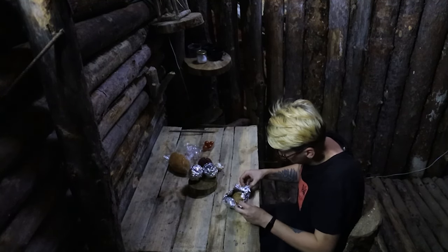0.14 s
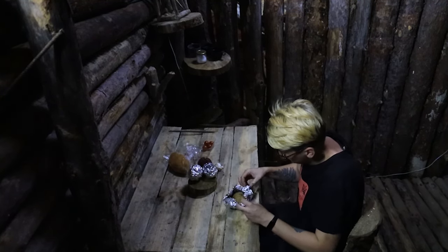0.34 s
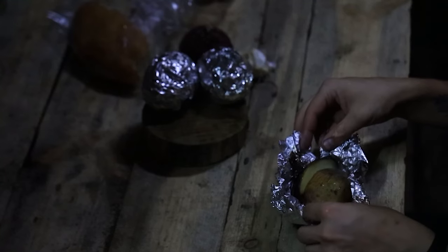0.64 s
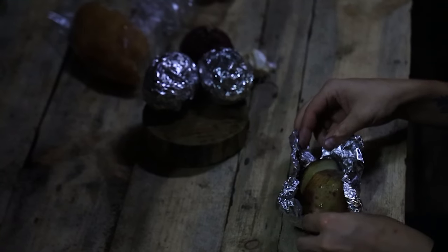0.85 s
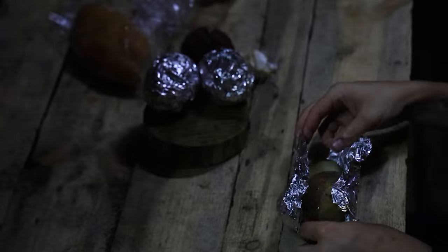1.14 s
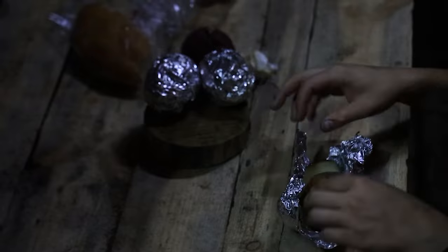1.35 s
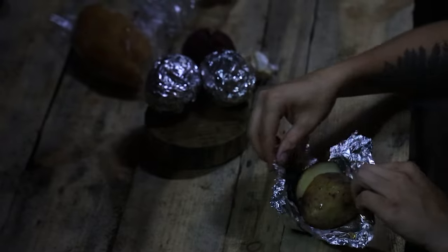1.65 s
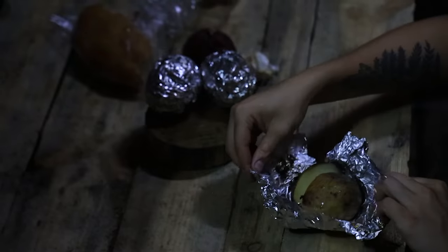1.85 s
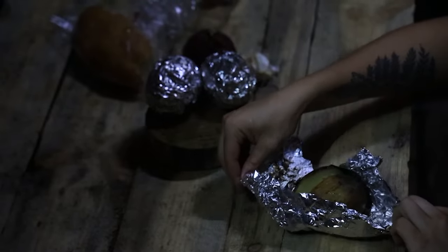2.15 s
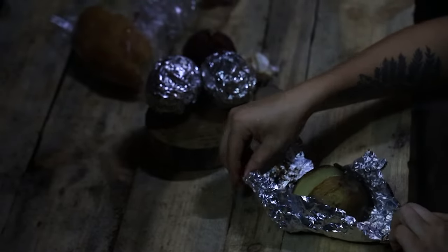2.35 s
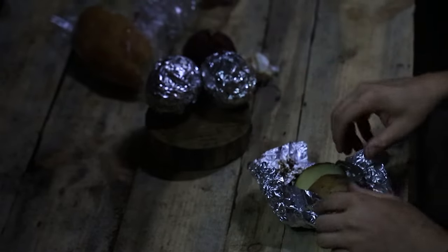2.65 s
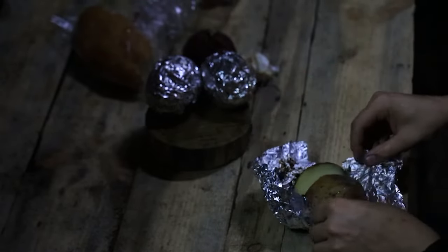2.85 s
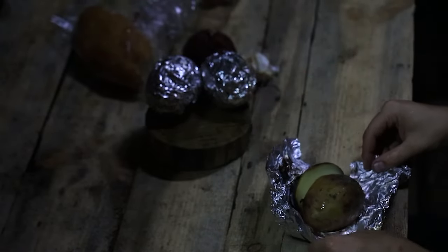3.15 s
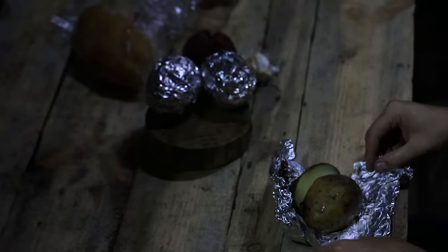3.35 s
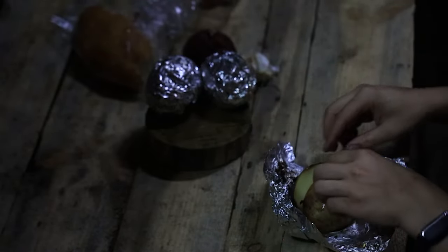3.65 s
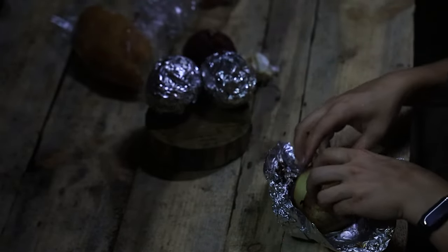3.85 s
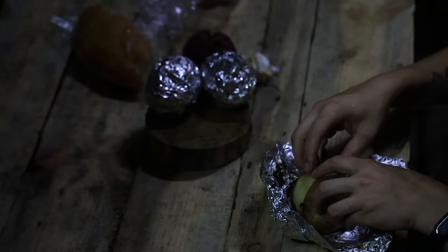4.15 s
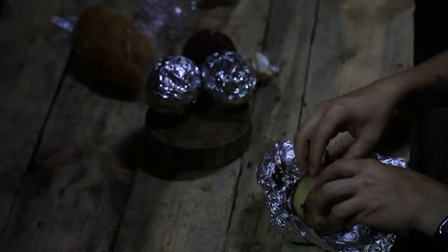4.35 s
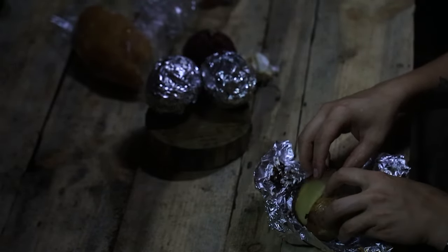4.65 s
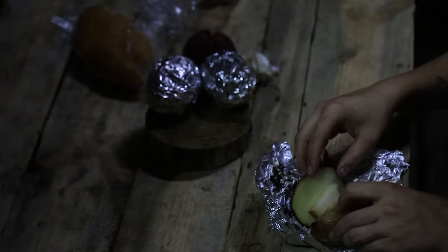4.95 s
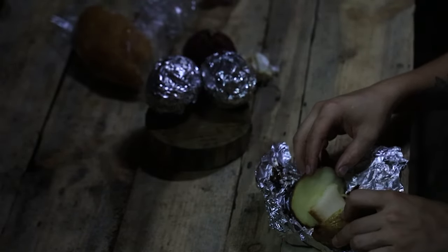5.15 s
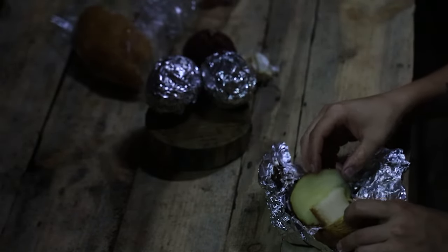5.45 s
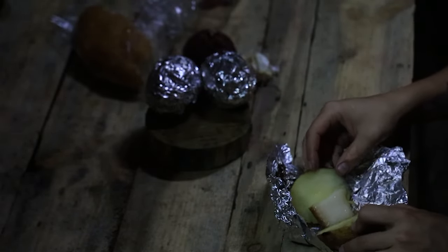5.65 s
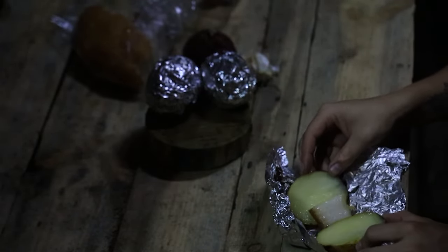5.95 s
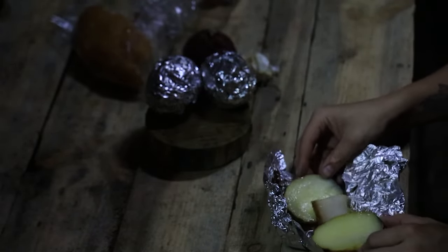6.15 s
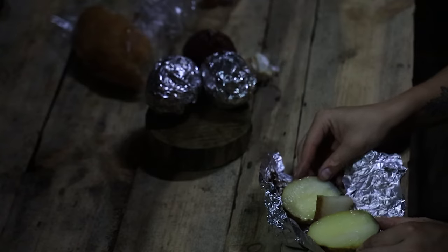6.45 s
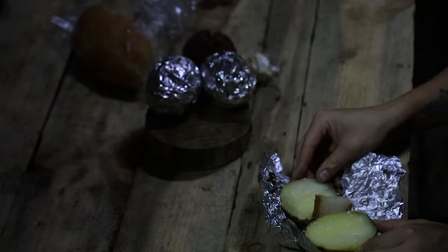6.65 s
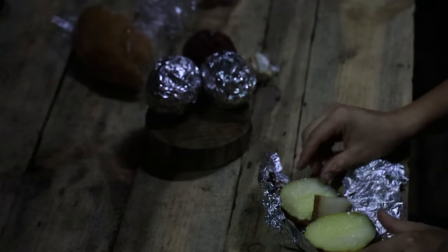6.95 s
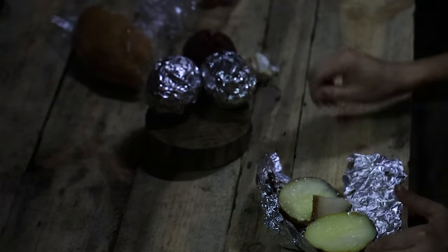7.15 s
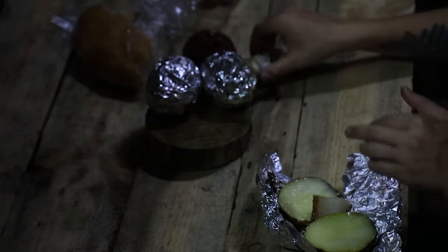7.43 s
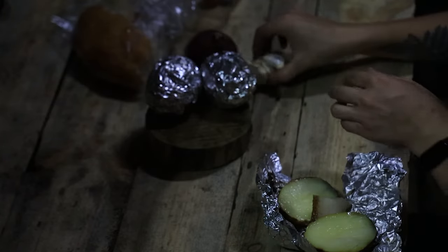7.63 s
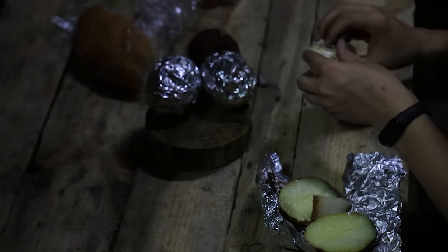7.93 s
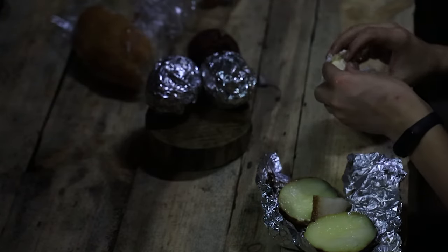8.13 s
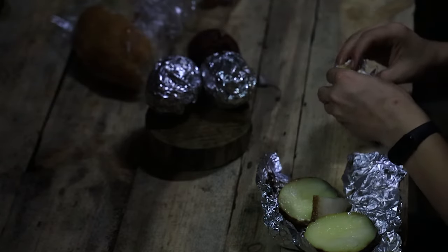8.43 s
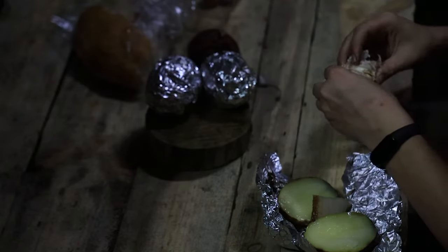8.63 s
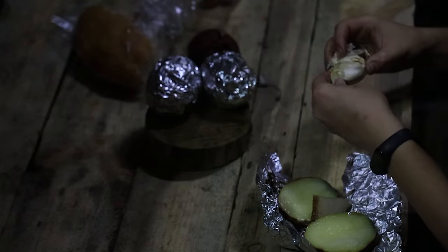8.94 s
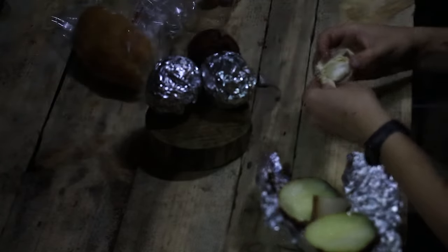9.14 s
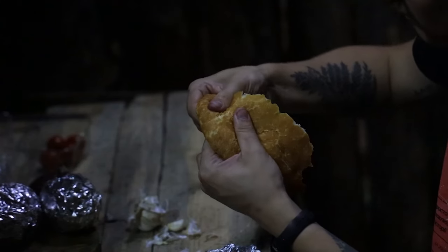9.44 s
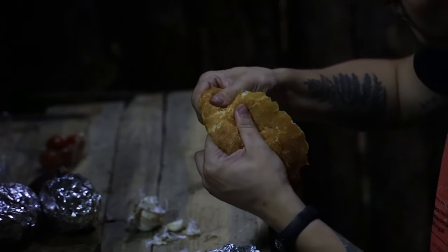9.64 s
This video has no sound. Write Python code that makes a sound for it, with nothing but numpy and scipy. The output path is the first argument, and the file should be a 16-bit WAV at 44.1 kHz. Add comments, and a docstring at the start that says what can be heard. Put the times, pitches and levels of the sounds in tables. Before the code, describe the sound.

Aluminium foil crackles and crinkles as it is peeled from a baked potato, then dry garlic skin snaps and rustles in a quiet log hut.

```python
"""Aluminium foil is unwrapped from a baked potato at a wooden table in a small, quiet log dugout.
Creases buckle in single snaps (clicks with settling ticks and a facet ring) over a fine crinkle of tiny rings.
Soft knocks are damped modes; filtered noise makes the shifting parcel and the sliding potato half.
Then a garlic bulb is picked up and cracked open, built like the foil but in a drier colour.
Log walls add a short tail of scattered paths; a murmur of air lies beneath, with a faint hum at the end."""
import sys
import numpy as np
from scipy import signal
from scipy.fft import rfft, irfft, next_fast_len
from scipy.io import wavfile
from scipy.ndimage import uniform_filter1d

SR = 44100
rng = np.random.default_rng(int(sys.argv[2]) if len(sys.argv) > 2 else 0)


def wrap_up_sound(samples):
    """Save the sound to the file named by the first command line argument, as 16-bit audio."""
    columns = np.atleast_2d(samples).T
    # keep every value between -1 and 1, then stretch to whole-number steps
    tamed = np.clip(columns, -1, 1)
    steps = np.round(tamed * 32767).astype(np.int16)
    wavfile.write(sys.argv[1], SR, steps)


N = 431738
TIME = np.arange(N) / SR

# Layer levels below are set ahead of the mix gains; body_db and sparkle_db are against the middle band.
# murmur of the air: freq_hz, level_db (per Hz, relative)
AIR_COLOUR = [(12, -46), (20, -20), (81, -5), (150, -5.5), (241, -1), (446, -4.5), (624, -7), (849, -7.5),
              (1220, -9.5), (1660, -12), (2260, -12), (2990, -13), (4420, -14.5), (9140, -19.5),
              (16000, -24.5)]
# left-right likeness of sound from all round: freq_hz, likeness (-1 to 1)
LIKENESS = [(30, 0.1), (120, 0.35), (300, 0.69), (700, 0.4), (1500, 0.31), (3000, 0.11), (6000, 0.059),
            (16000, 0.024)]
# the loudest creases to buckle: start_s, level_db, body_db, sparkle_db, ring_hz, ring_share (0-1)
FOIL_SNAPS = [(0.0085, -37.5, -11.5, -22, 2120, 0.065), (0.072, -44, -1, 3, 4560, 0.79),
              (0.1098, -35.5, -11, 6, 2960, 0.082), (0.1798, -43, -16, -6, 2040, 0),
              (0.2257, -30.5, -26, 5, 3540, 0.31), (0.3499, -40.5, -6, 3.5, 2460, .14),
              (0.6135, -40.5, 9, 14.5, 1700, 0.37), (0.8194, -33, -6.5, -10, 2070, 0),
              (0.88, -34.5, -24, 0, 4680, 0), (0.9328, -40.5, 6, -17, 2410, .4),
              (0.9941, -34, -21, 10, 2420, 0.34), (1.0104, -39, -14, -10, 2300, 0.65),
              (1.022, -28.5, -5, -4.5, 2150, 0), (1.0517, -37, -14, -11, 2120, 1),
              (1.0724, -33, -25, -2, 3900, 0), (1.0886, -36, -24, 1, 5650, 0),
              (1.1596, -31.5, -8.5, -7, 4370, 0), (1.249, -43.5, -7, 0, 5990, 0.14),
              (1.2667, -38, -4, -22, 1977, 1), (1.6316, -42.5, -7, 9, 6500, 0),
              (1.7019, -49.5, -10, 0, 4100, 0.69), (1.8004, -32.5, -9.5, -1, 3740, 0.27),
              (1.9026, -49.5, -16, -10, 4300, .7), (1.955, -44, -2.5, -27, 2970, 0.41),
              (2.0197, -35, -12, 3.5, 5700, 0.0043), (2.0522, -37.5, -10.5, 1, 4500, 0.023),
              (2.0942, -41.5, -12, 9, 4490, 0), (2.1027, -41.5, -12, 12, 2780, 0.26),
              (2.1569, -33.5, -4, -7, 2480, 0.034), (2.1738, -36, -7, -4, 2820, 0.057),
              (2.204, -32, -24, 1.5, 3500, 0.34), (2.235, -34, -15, -4, 2600, 0),
              (2.3516, -49, -14, 16, 3930, 0.23), (2.4088, -48.5, -17, -8, 2530, 0.21),
              (2.6067, -52, -17, -18, 3200, 0.96), (2.7318, -45.5, 0, -2, 4270, .6),
              (2.7771, -33, -7, 4.5, 4140, 0.59), (2.9411, -50, -8, -6, 4950, 0.8),
              (3.0075, -36.5, -2, -22, 5080, 0.54), (3.1511, -38, -11, -0.5, 4770, 0),
              (3.223, -44.5, -19, -9, 3130, .27), (3.2456, -44.5, -12, -19, 2000, 0.74),
              (3.2992, -40.5, -8.5, -12, 2110, 0.17), (3.352, -36, -13, -7, 5230, 0),
              (3.5462, -45, -11, 3.5, 8800, 0.04), (4.143, -56.5, -12, -14, 2360, 0.2),
              (4.4034, -44.5, -9, 7, 4630, 0.6), (4.968, -55.5, -12, 19, 4240, .5),
              (5.027, -56, 0, 5, 4530, 0.18), (5.0641, -51, -25, -6, 4260, 0.13),
              (5.3737, -39.5, -7, 19, 7770, .5), (5.4081, -41.5, -7, -3, 4400, 0),
              (5.4955, -37.5, -30, 7, 5640, 0), (5.5517, -37.5, -15, 3.5, 5950, 0.07),
              (5.641, -49, -19, 4, 4950, 0.18), (5.6686, -35, -13, 5.5, 3190, 0.51),
              (5.7473, -35, -19, -9, 2170, 0.01), (5.8371, -35.5, -11, 5, 8740, 0.077),
              (5.8483, -35.5, -21, -1, 4900, 0.43), (5.9032, -37.5, -6.5, 0, 2880, 0.38),
              (6.0072, -41.5, -4, 5.5, 2490, 0.13), (6.051, -40, -15, -2, 1730, 0.39),
              (6.1106, -38, -7, 0, 2260, 0.35), (6.1505, -34.5, -8, 2, 3930, 0.63),
              (6.3347, -39.5, -10, -6, 4430, 0.55), (6.4758, -46, -14, 1, 3030, 0.4),
              (6.5429, -35, -11, 15, 3700, 0.63), (6.5538, -32, -6.5, -5, 3550, 0.044),
              (6.7932, -49, -16, 4, 1520, .4), (6.8223, -47.5, -4, -6, 2190, 0.66),
              (6.9035, -47.5, -16, 2, 7600, 0.53), (6.984, -44, -5, -4, 2350, 0.27),
              (7.0982, -39, -4.5, -9, 2330, 0.47)]
# pulls and presses of the fingers on the foil: start_s, swell_s, fade_s, level_db, body_db, sparkle_db
FOIL_STROKES = [(0.02, 0.22, 0.12, -50.5, -15, -3), (0.62, 0.049, 0.091, -44, -3.5, -4),
                (0.82, 0.2, 0.13, -37, -5, -3.5), (1.15, 0.011, 0.021, -34.5, 0, -6),
                (1.26, 0.047, 0.01, -37.5, -4.5, -3.5), (1.585, 0.027, 0.031, -41.5, -6, -4),
                (1.7, 0.013, 0.043, -50, -3, -5), (1.82, 0.059, .04, -54, -4, -2),
                (2.06, 0.1, 0.16, -41, -9, -6.5), (2.157, 0.014, .008, -32, -6, -9),
                (2.275, 0.04, 0.0086, -37.5, -9.5, -7.5), (2.415, 0.052, 0.02, -41.5, -3, -1),
                (2.605, .015, 0.014, -49, -4, -3.5), (2.765, 0.084, 0.022, -42.5, -5, -3),
                (3.05, 0.032, 0.086, -40.5, -14, -7), (3.23, 0.062, 0.037, -50, -7, -10),
                (3.46, 0.0074, 0.058, -45.5, -12, -3), (3.965, 0.02, 0.049, -54.5, -14, -8),
                (4.14, .01, 0.074, -60.5, -15, -13), (4.395, 0.0073, 0.022, -51, -19, -7),
                (4.51, .022, 0.038, -57, -22, -3), (4.87, 0.013, 0.028, -57.5, -6, -8),
                (5.29, 0.075, 0.025, -51.5, -12, -7), (5.375, 0.033, 0.013, -41.5, -10, -11),
                (5.495, .01, 0.14, -55, -19, 13), (5.7, 0.28, 0.092, -46.5, -9, -2),
                (6.0, 0.023, 0.12, -46.5, -11, -20), (6.183, 0.0059, .095, -35.5, -9, -6),
                (6.5, 0.049, 0.029, -37, -10.5, -5.5), (6.8, 0.013, 0.2, -52, -6, -4),
                (7.085, 0.0069, 0.0068, -44.5, -17, -8)]
# tone of the foil: freq_hz, level_db (per Hz, relative)
FOIL_COLOUR = [(120, -32), (300, -9), (550, -8.5), (800, -5), (1400, -1), (2200, -1), (3000, 1), (4200, -1),
               (6500, -7.5), (9000, -14), (13000, -15.5), (16000, -26)]
# body, middle and sparkle bands: low_hz, high_hz
BANDS_HZ = [(300, 1500), (1500, 5500), (5500, 16000)]
# hollow of the opened wrapper: pitch_hz, t60_s, level_db (against the direct sound, at the resonance)
WRAPPER_MODES = [(1980, 0.087, -2.5), (2135, 0.045, 1), (2400, 0.016, -8.5)]
# ring of the dugout: freq_hz, t60_s
ROOM_T60 = [(100, .08), (300, 0.28), (1000, 0.17), (3000, 0.22), (7000, 0.18), (15000, 0.19)]
# soft knocks and dull thumps: start_s, level_db, pitch_hz, t60_s
KNOCKS = [(0.216, -36, 115, 0.028), (0.218, -55, 250, 0.026), (2.475, -42.5, 484, 0.058),
          (5.415, -50.5, 316, 0.066), (5.747, -44.5, 326, 0.053), (7.673, -58, 112, 0.22),
          (8.237, -49.5, 282, 0.05), (9.076, -41, 1690, 0.019), (9.081, -38.5, 470, 0.037),
          (9.468, -51, 270, .06), (9.746, -44, 1615, 0.046), (9.762, -42.5, 1320, 0.045),
          (9.764, -48.5, 434, 0.096)]
# dull rubbing as the parcel is shifted: time_s, level_db
SHIFT_CURVE = [(0.325, -69), (0.345, -51), (0.385, -54), (0.45, -69), (0.508, -57), (0.525, -80)]
# tone of that rubbing: freq_hz, level_db (per Hz, relative)
SHIFT_COLOUR = [(15, -16), (40, -13), (90, 1), (150, 4), (350, -1), (800, 1), (2000, -27), (6000, -62)]
# bright, even hiss during the handling, ending abruptly: time_s, level_db
HISS_CURVE = [(0.345, -77), (0.385, -44.5), (0.516, -48), (0.522, -80)]
# tone of that hiss: freq_hz, level_db (per Hz, relative)
HISS_COLOUR = [(1000, -0.5), (6000, -5), (11000, -4), (16000, -12)]
# the potato half tips over and slides down onto the foil: time_s, level_db
SLIDE_CURVE = [(6.165, -64), (6.19, -47.5), (6.235, -47.5), (6.28, -62), (6.33, -95)]
# tone of that slide: freq_hz, level_db (per Hz, relative)
SLIDE_COLOUR = [(120, -27), (300, -9), (480, -7), (620, -6), (900, -8.5), (1500, -17), (4000, -43)]
# cracks of dry garlic skin: start_s, level_db, body_db, sparkle_db, ring_hz, ring_share (0-1)
GARLIC_CRACKS = [(7.5058, -49.5, -2, 0, 3500, .06), (7.5504, -49, -11, -1, 3700, 0.038),
                 (8.2114, -44.5, -24, 6, 7340, 0.088), (8.3943, -46.5, -19, 11, 7700, 0),
                 (8.4317, -41, -29, -12, 3900, 1), (8.5679, -24.5, -14.5, 5, 3830, 0.12),
                 (8.5884, -29.5, -21, 28, 6700, .13), (8.714, -44.5, -16, 14, 8200, .2),
                 (8.737, -47, -14, 18, 6040, 0.52), (8.7929, -42, -21, 12, 6070, 0.66),
                 (8.9176, -41.5, -24, 9, 5440, 0), (8.9215, -35, -31, 8.5, 5530, 0.46),
                 (9.0068, -56, -12, -5, 7590, .2), (9.211, -53, -8, 7, 7000, 0)]
# rubs of the fingers on the papery skin: start_s, swell_s, fade_s, level_db, body_db, sparkle_db
GARLIC_STROKES = [(7.5, .12, .085, -52.5, -13, -3.5), (7.82, .055, 0.14, -61.5, -8, 0),
                  (8.015, 0.11, 0.031, -50.5, -11.5, 0.5), (8.22, 0.043, .012, -46, -11.5, -0.5),
                  (8.4, 0.029, 0.15, -58, -12, 7), (8.575, .048, .008, -39, -28, 6),
                  (8.75, 0.062, 0.06, -46, -17, 7.5), (9.09, 0.21, 0.016, -55, -4, 0.5)]
# tone of the garlic skin: freq_hz, level_db (per Hz, relative)
GARLIC_COLOUR = [(150, -35), (400, -32), (900, -20.5), (2000, -11.5), (3500, -8), (6000, -9.5),
                 (9000, -11.5), (13000, -12), (16000, -22)]
# faint hum at the end: pitch_hz (before the waver), level_db
HUM = [(270, -69.5), (860, -68)]

AIR_DB = -58
# the murmur's level flutters slightly: rms depth, smoothing time, corner of its low-pass
FLUTTER_DB, FLUTTER_S, FLUTTER_HZ = 1.04, 0.073, 1200
# a faint click about 9 ms before each snap: mean lead, level against the snap
EARLY_CLICK_S, EARLY_CLICK_DB = .009, -19.5
FACET_RING_S = .0011  # a freed facet's decay to 1/e
# a stroke grips below its full level, swells, then eases off before letting go
GRIP_DB, EASE_DB = -6, -4.5
# how fast the fingers take hold and let go
GRIP_DB_PER_S, RELEASE_DB_PER_S = 498, 450
# afterwards the creases go on relaxing faintly: level against the stroke, slope
RELAX_DB, RELAX_DB_PER_S = -25, 100
LEFT_LAG = 2  # samples of extra direct path to the left microphone
HUM_FROM_S = 9.33
EDGE_HZ = 16300  # top of the audible band


def amp(db):
    """Decibels to gain."""
    return 10 ** (np.asarray(db) / 20)


def evened(x):
    """Scales to rms 1."""
    return x / np.sqrt(np.mean(x ** 2) + 1e-20)


def unit(x):
    """Scales to energy 1."""
    return x / np.sqrt(np.sum(x ** 2, -1, keepdims=True) + 1e-20)


def read(points, hz):
    """Reads a table on a log-frequency axis."""
    f, value = np.transpose(points)
    return np.interp(np.log(hz + 1), np.log(f + 1), value)


def level(rows):
    """Gain over time from a level curve; silent outside it."""
    s, db = np.transpose(rows)
    return amp(np.interp(TIME, s, db, left=-150, right=-150))


def add(mix, s, sound):
    """Mixes a sound in at s seconds."""
    part = mix[max(round(s * SR), 0):][:len(sound)]
    part += sound[:len(part)]


def causal(colour, size=2048):
    """The shortest click with a given spectrum (minimum phase)."""
    log_gain = np.log(amp(read(colour, abs(np.fft.fftfreq(size, 1 / SR)))))
    spectrum = np.exp(np.conj(signal.hilbert(log_gain)))
    return np.fft.ifft(spectrum).real[:size // 2]


def tinted(x, colour):
    """Gives a signal a spectrum without smearing its attacks."""
    return signal.oaconvolve(x, causal(colour))[:len(x)]


def band_clicks(colour):
    """The body, middle and sparkle parts of a material's click."""
    filters = [signal.butter(N=3, Wn=band, btype="band", fs=SR, output="sos") for band in BANDS_HZ]
    return [signal.sosfilt(sos, causal(colour)) for sos in filters]


def shares(body_db, sparkle_db):
    """Gains of body, middle and sparkle whose powers sum to 1."""
    gains = amp([body_db, 0, sparkle_db])
    return gains / np.sqrt((gains ** 2).sum(0))


def diffuse(size):
    """White noise arriving from all round at two close microphones."""
    a, b = rfft(rng.standard_normal((2, size)))
    same = np.clip(read(LIKENESS, np.fft.rfftfreq(size, 1 / SR)), -1, 1)
    return irfft([a, same * a + np.sqrt(1 - same ** 2) * b], size)


def air():
    """The still room: thin hiss over a low murmur whose level flutters slightly."""
    size = next_fast_len(N // 2 + 1) * 2
    colour = amp(read(AIR_COLOUR, np.fft.rfftfreq(size, 1 / SR)))
    bed = amp(AIR_DB) * evened(irfft(rfft(diffuse(size)) * colour, size)[:, :N])
    murmur = signal.sosfilt(signal.butter(1, FLUTTER_HZ, fs=SR, output="sos"), bed)
    span = int(FLUTTER_S * SR)
    flutter = evened(uniform_filter1d(uniform_filter1d(rng.standard_normal(N), span), span))
    return bed + (amp(FLUTTER_DB * flutter) - 1) * murmur


def snaps(rows, colour, settle, settle_s, size=2048):
    """A crease flips with a sharp crack; neighbours settle in tiny ticks and the facet rings briefly."""
    out, t, clicks = np.zeros(N), np.arange(size) / SR, band_clicks(colour)
    attack_samples = .008 * SR  # a snap has the energy of its level held for 8 ms
    for s, db, body_db, sparkle_db, hz, share in rows:
        ticks = unit(rng.standard_normal(size) ** 3 * np.exp(-t / settle_s))
        force = signal.unit_impulse(size) + settle * ticks
        click = sum(gain * unit(band) for gain, band in zip(shares(body_db, sparkle_db), clicks))
        # differenced, as a facet is too small to radiate bass
        facet = np.diff(np.sin(2 * np.pi * hz * t) * np.exp(-t / FACET_RING_S), prepend=0)
        crack = unit(signal.fftconvolve(force, click)[:size])
        ring = unit(signal.fftconvolve(force, facet)[:size])
        share = np.clip(share, 0, .98)
        gain = amp(db) * np.sqrt(attack_samples)
        # a faint click comes shortly before the snap
        add(out, s - EARLY_CLICK_S * rng.uniform(.7, 1.3), gain * amp(EARLY_CLICK_DB) * unit(click))
        add(out, s, gain * unit(np.sqrt(1 - share) * crack + np.sqrt(share) * ring))
    return out


def stroke(s, swell_s, fade_s):
    """Gain of one finger stroke over time: grip, swell, ease off, let go, relax."""
    t = TIME[::64] - s
    early, late = np.maximum(-t, 0), np.maximum(t - swell_s - fade_s, 0)
    held_db = np.interp(t, np.cumsum([0, swell_s, fade_s]), [GRIP_DB, 0, EASE_DB])
    release_db = held_db - RELEASE_DB_PER_S * late
    relax_db = RELAX_DB - RELAX_DB_PER_S * late
    return amp(np.maximum(release_db, relax_db) - GRIP_DB_PER_S * early)


def effort(strokes):
    """How hard the strokes drive body, middle and sparkle over time; their powers add."""
    power = sum(np.outer(shares(body_db, sparkle_db), amp(db) * stroke(s, swell_s, fade_s)) ** 2
                for s, swell_s, fade_s, db, body_db, sparkle_db in strokes)
    return [np.interp(TIME, TIME[::64], band) for band in np.sqrt(power)]


def rustle(strokes, colour, per_s, spread_db, cycles, hiss, count=28):
    """Swarms of tiny buckles, each ringing one small facet for a few cycles, over the hiss of sliding."""
    t = np.arange(512) / SR
    chance, size, facet = rng.random(N), rng.exponential(1, N), rng.integers(0, count, N)
    kicks = amp(spread_db * np.minimum(size, 3.5)) * (chance < per_s / SR) * rng.choice([-1, 1], N)
    grains = np.zeros(N + len(t))
    hz = np.geomspace(700, 15000, count)[:, None]
    rings = unit(np.cos(2 * np.pi * hz * t) * np.exp(-t * hz / cycles)) * np.sqrt(hz)
    for i in np.flatnonzero(kicks):
        grains[i:i + len(t)] += kicks[i] * rings[facet[i]]
    swarm = evened(grains[:N]) + evened(kicks) + hiss * rng.standard_normal(N)
    out = np.zeros(N)
    for gain, click in zip(effort(strokes), band_clicks(colour)):
        band = signal.oaconvolve(swarm, click)[:N]
        # the hand feeds in its work steadily: a big buckle relieves those round it
        local_power = abs(uniform_filter1d(band ** 2, size=1500))
        out += gain * band / np.sqrt(local_power + 1e-12)
    return out


def wrapper(x):
    """The crumpled bowl of foil rings faintly with whatever happens in it."""
    t = np.arange(SR // 5) / SR
    modes = np.zeros(len(t))
    for hz, t60, db in WRAPPER_MODES:
        peak_scale = 2 * np.log(1000) / (t60 * SR)  # keeps a long ring from gaining level
        modes += amp(db - 60 * t / t60) * np.cos(2 * np.pi * hz * t) * peak_scale
    return x + signal.oaconvolve(x, modes)[:N]


def foil():
    """Single snaps over a fine crinkle, both coloured by the wrapper's hollow."""
    creases = amp(1) * snaps(FOIL_SNAPS, FOIL_COLOUR, settle=0.97, settle_s=0.0029)
    crinkle = rustle(FOIL_STROKES, FOIL_COLOUR, per_s=1700, spread_db=4.5, cycles=3.7, hiss=0.33)
    return wrapper(creases + amp(-2.0) * crinkle)


def reflections(table_db=-2, table_s=.0014, near_db=-6, near_s=.009, tail_db=-4.5):
    """Table and hands scatter the sound at once, the nearest logs soon after, then the whole dugout."""
    size = SR // 5
    t = np.arange(size) / SR
    table = unit(diffuse(size) * np.exp(-t / table_s))
    near = unit(diffuse(size) * np.exp(-t / near_s) * (1 - np.exp(-t / 0.0027)))
    hz, when, z = signal.stft(diffuse(size), SR, nperseg=256)
    decay = amp(-60 * when / read(ROOM_T60, hz)[:, None])
    tail = signal.istft(z * decay, SR, nperseg=256)[1][:, :size]
    tail = unit(tail * (1 - np.exp(-t / 0.0015)))
    paths = amp(table_db) * table + amp(near_db) * near + amp(tail_db) * tail
    # many paths together favour no broad range of pitch
    spectrum = rfft(paths, 2 * size)
    power = (abs(spectrum) ** 2).mean(0)
    return irfft(spectrum * np.sqrt(power.mean() / uniform_filter1d(power, size=120)))[:, :size]


def dugout(x, left_db=-4.5, right_db=-1.5, count=28, size=3000):
    """Facets keep facing new ways, so each short stretch takes the next of several sets of room paths."""
    paths = [reflections() for _ in range(count)]
    window = np.sin(np.pi * (np.arange(2 * size) + .5) / (2 * size))
    padded, out = np.pad(x, (size, 2 * size)), np.zeros((2, N + size))
    for k, start in enumerate(range(0, N + size, size)):
        stretch = padded[start:start + 2 * size] * window
        heard = signal.fftconvolve(stretch[None], paths[k % count], axes=1)
        for channel, sound in zip(out, heard):
            add(channel, start / SR, sound)
    # the direct sound reaches the right microphone louder and a few samples earlier
    direct = np.array([amp(left_db) * np.pad(x, (LEFT_LAG, 0))[:N], amp(right_db) * x])
    return out[:, size:] + direct


def knocks(noisy=0.49, overtone=0.3):
    """A soft blow: a damped low mode, its overtone and a puff in the same range."""
    out, t = np.zeros(N), np.arange(SR // 4) / SR
    for s, db, hz, t60 in KNOCKS:
        puff_band = signal.butter(2, [hz / 4, hz * 2.9], "band", fs=SR, output="sos")
        puff = evened(signal.sosfilt(puff_band, rng.standard_normal(len(t))))
        modes = np.sin(2 * np.pi * hz * t) + overtone * np.sin(2 * np.pi * hz * 1.7 * t)
        soft_attack = 1 - np.exp(-t / 0.00082)
        add(out, s, amp(db - 60 * t / t60) * (modes + noisy * puff) * soft_attack)
    return out


def rub(curve, colour, per_s, grit):
    """Soft stick and slip: dull noise with small uneven catches."""
    catches = rng.standard_normal(N) * (rng.random(N) < per_s / SR)
    return level(curve) * evened(tinted(rng.standard_normal(N) + grit * evened(catches), colour))


def parcel_shift():
    """The parcel is moved: dull rubbing under a bright hiss, different at each microphone."""
    sides = np.array([rub(SHIFT_CURVE, SHIFT_COLOUR, per_s=55, grit=0.71) for side in "LR"])
    bright = np.array([tinted(side, HISS_COLOUR) for side in rng.standard_normal((2, N))])
    return amp(2) * (sides + 0.3 * sides[::-1]) + level(HISS_CURVE) * evened(bright)


def potato_slide():
    """The potato half sticks and slips as it slides down onto the foil."""
    return amp(4.5) * rub(SLIDE_CURVE, SLIDE_COLOUR, per_s=290, grit=1.0)


def garlic():
    """Dry skin cracks in single snaps and rustles under the fingers."""
    cracks = amp(1.5) * snaps(GARLIC_CRACKS, GARLIC_COLOUR, settle=0.48, settle_s=0.0033)
    papery = rustle(GARLIC_STROKES, GARLIC_COLOUR, per_s=900, spread_db=2.5, cycles=3.9, hiss=0.58)
    return cracks + amp(0.4) * papery


def hum(waver=0.004):
    """Faint steady tones, their pitch wavering slightly together, that fade in quickly near the end."""
    drift = evened(uniform_filter1d(rng.standard_normal(N), size=2000))
    turns = np.cumsum(1 + waver * drift) / SR
    tones = sum(amp(db) * np.sin(2 * np.pi * hz * turns) for hz, db in HUM)
    return tones * np.clip((TIME - HUM_FROM_S) / 0.026, 0, 1)


def scene():
    """Foil, potato and garlic on the table, a little to the right, in the still air of the dugout."""
    blows = knocks()  # heard in the room, with a weaker dry share
    in_room = dugout(foil() + garlic() + potato_slide() + amp(-5.0) * blows)
    heard = in_room + amp(-10.0) * blows + parcel_shift()
    # small left/right trims in dB
    return heard * amp([[-.4], [.4]]) + (air() + hum()) * amp([[-.3], [.3]])


def record(dry):
    """Limits the band with a steep low-pass at EDGE_HZ."""
    lowpass = signal.firwin(401, EDGE_HZ, window=("kaiser", 9), fs=SR)
    return signal.oaconvolve(dry, lowpass[None], "same")


dry = scene()
out = record(dry)
wrap_up_sound(out)
```